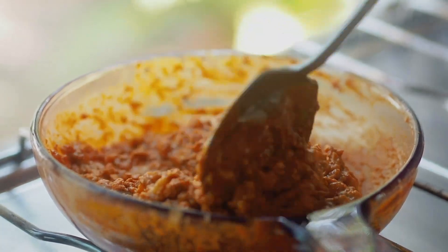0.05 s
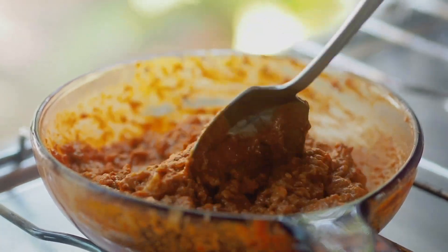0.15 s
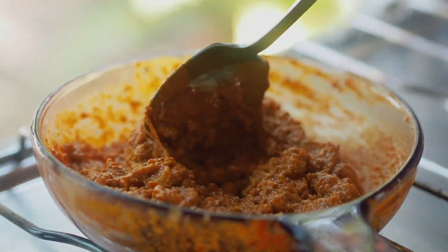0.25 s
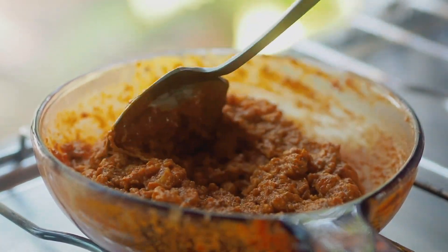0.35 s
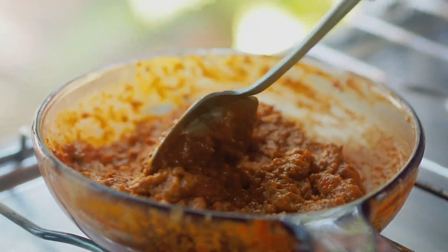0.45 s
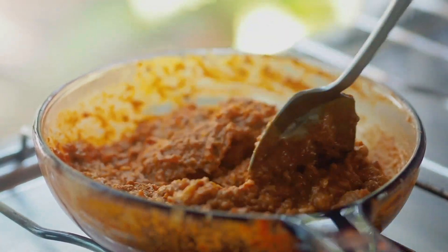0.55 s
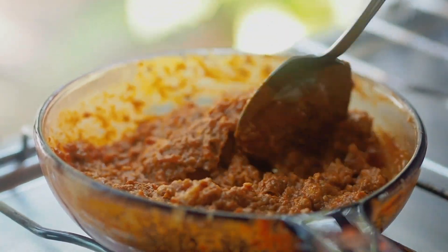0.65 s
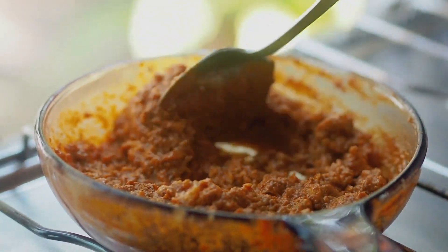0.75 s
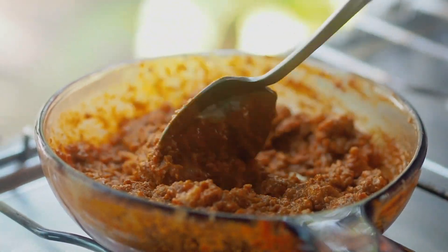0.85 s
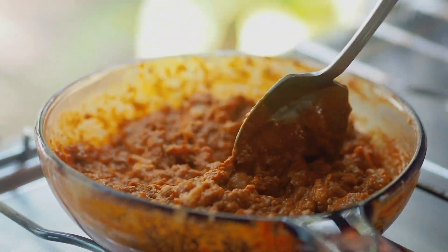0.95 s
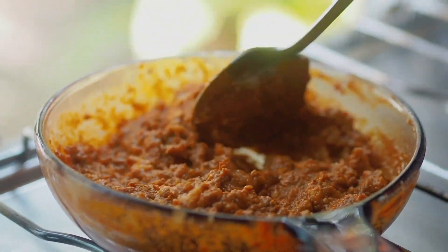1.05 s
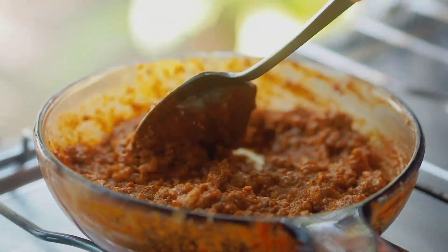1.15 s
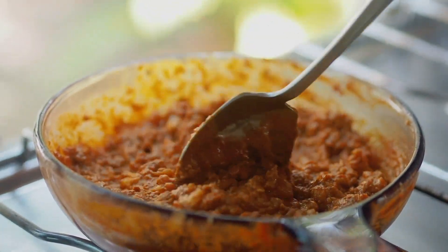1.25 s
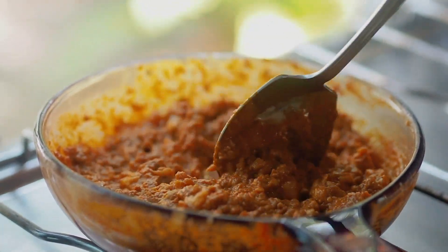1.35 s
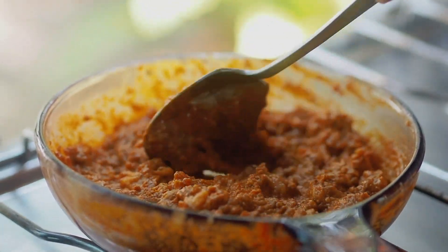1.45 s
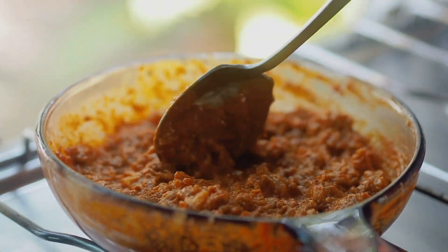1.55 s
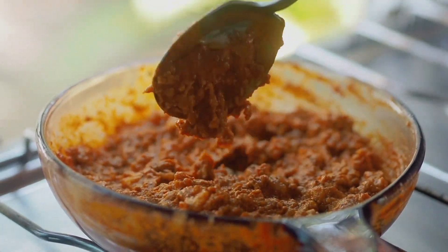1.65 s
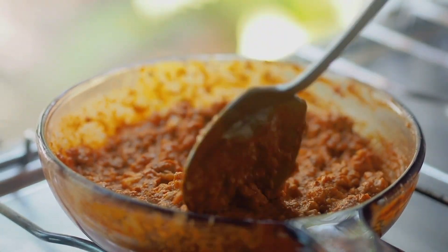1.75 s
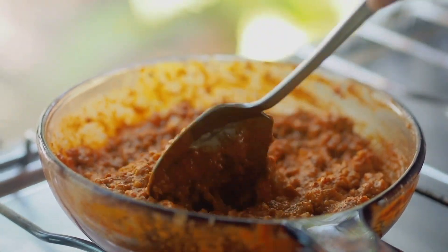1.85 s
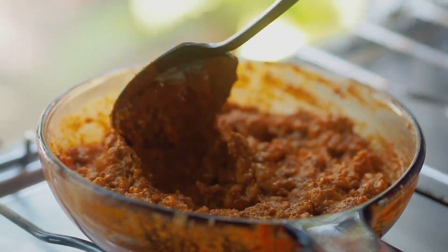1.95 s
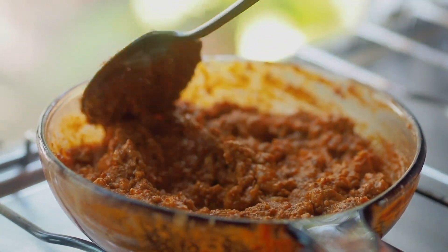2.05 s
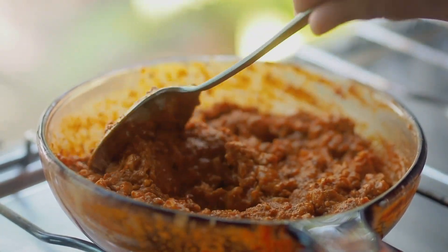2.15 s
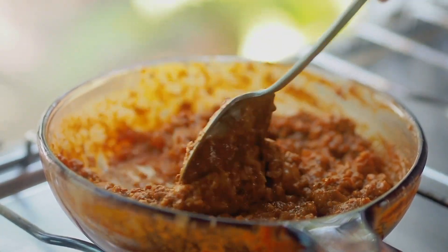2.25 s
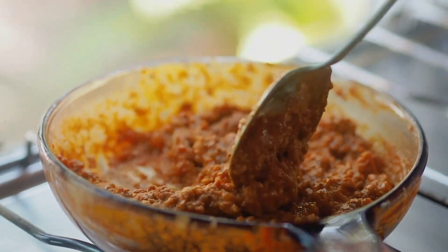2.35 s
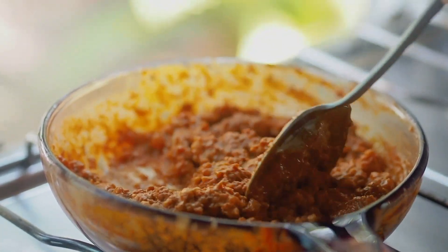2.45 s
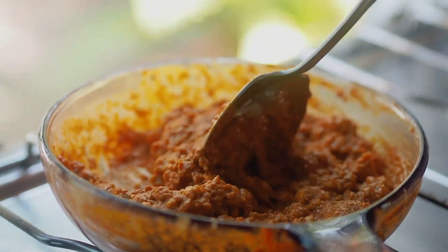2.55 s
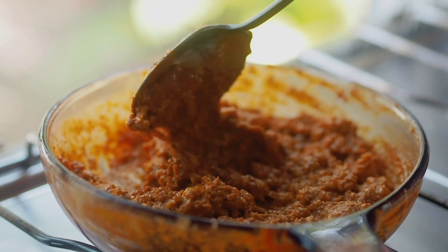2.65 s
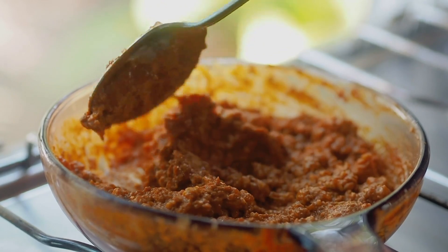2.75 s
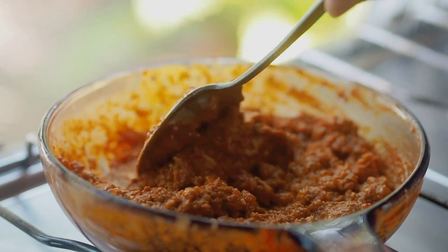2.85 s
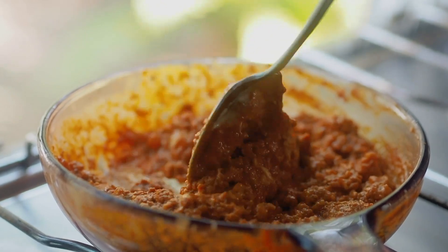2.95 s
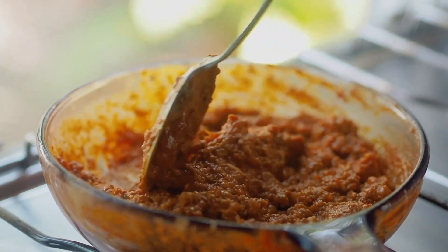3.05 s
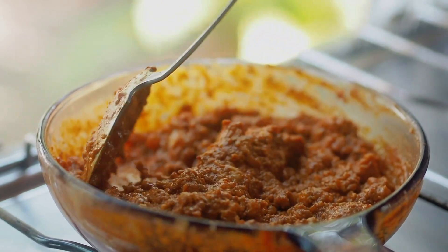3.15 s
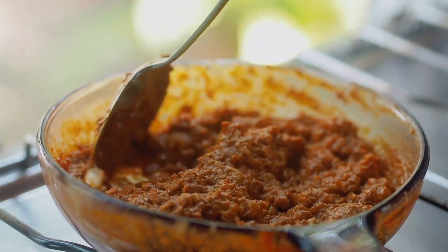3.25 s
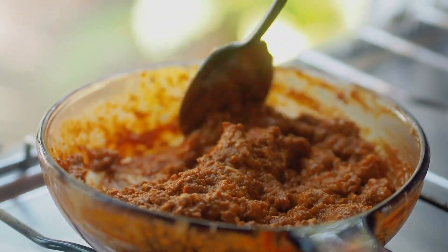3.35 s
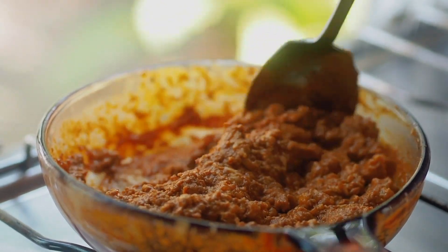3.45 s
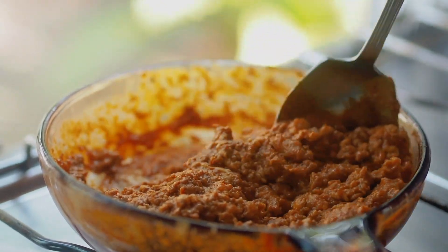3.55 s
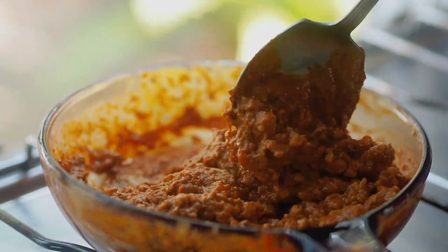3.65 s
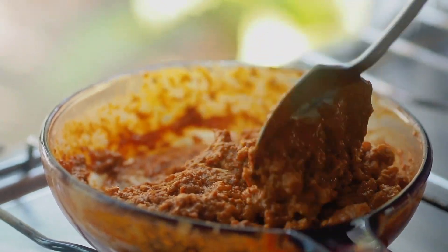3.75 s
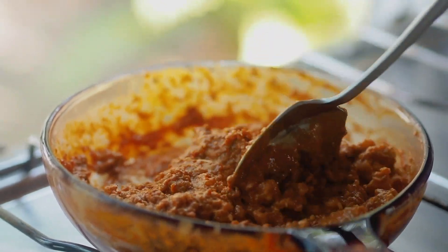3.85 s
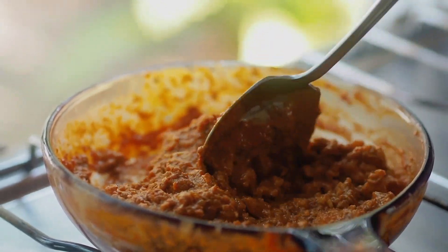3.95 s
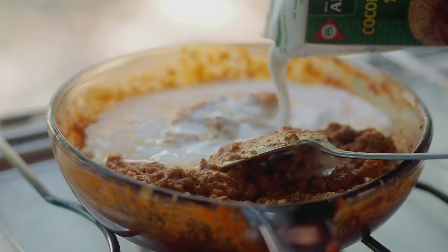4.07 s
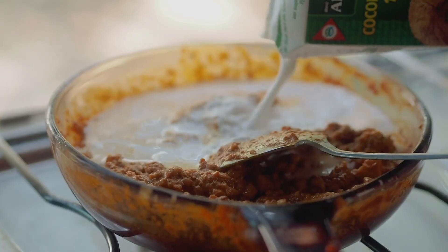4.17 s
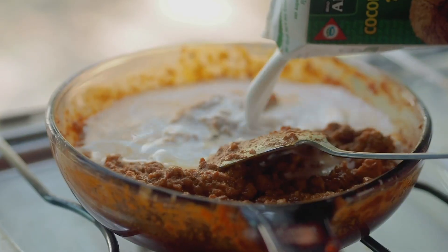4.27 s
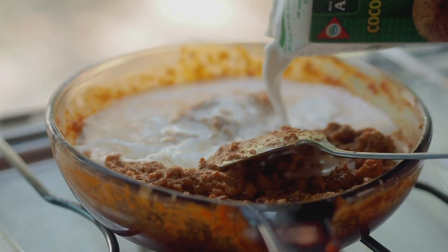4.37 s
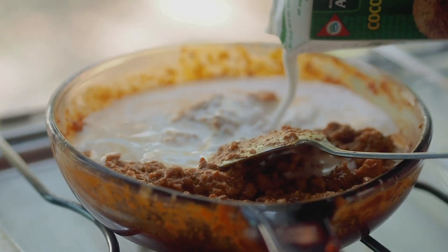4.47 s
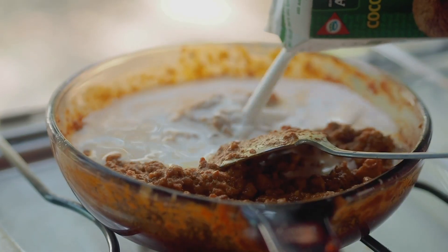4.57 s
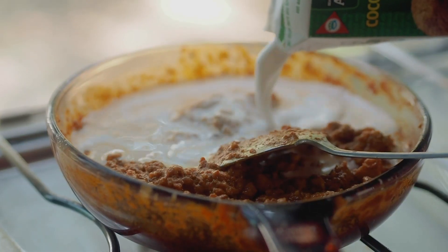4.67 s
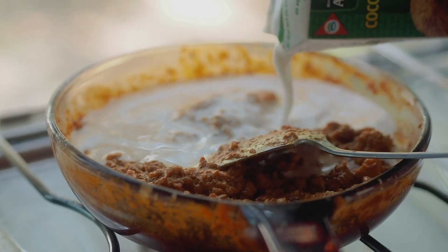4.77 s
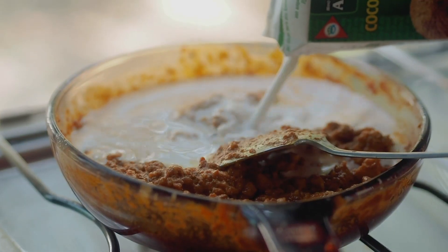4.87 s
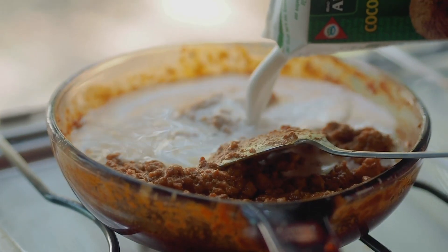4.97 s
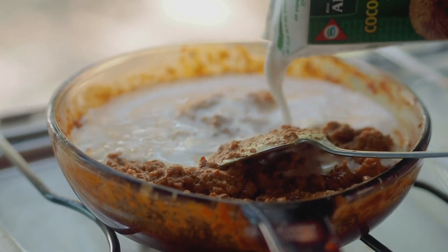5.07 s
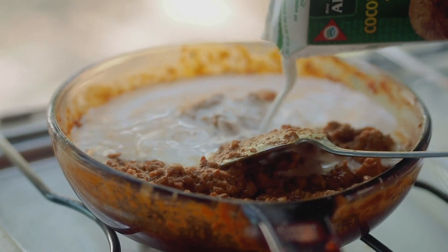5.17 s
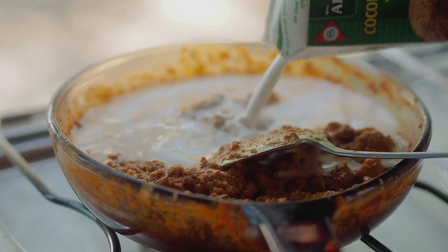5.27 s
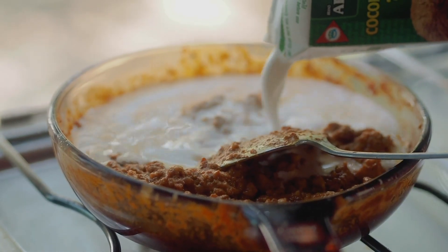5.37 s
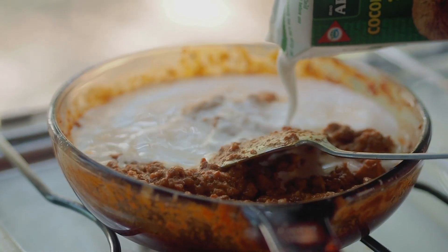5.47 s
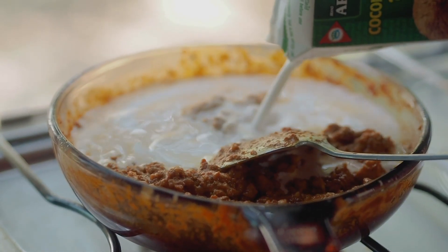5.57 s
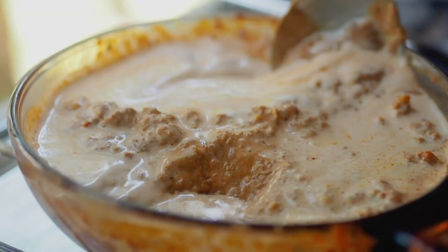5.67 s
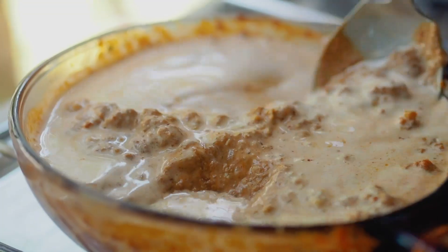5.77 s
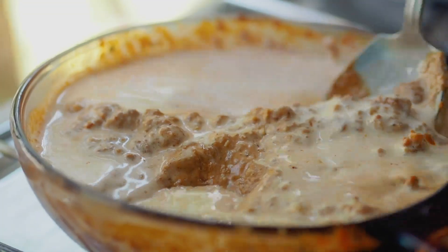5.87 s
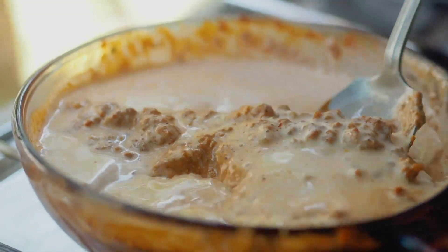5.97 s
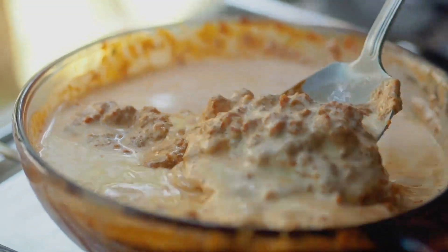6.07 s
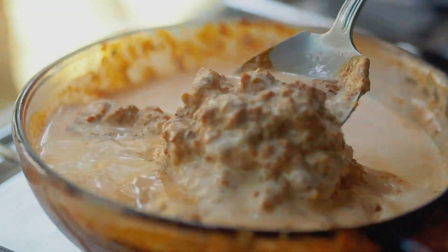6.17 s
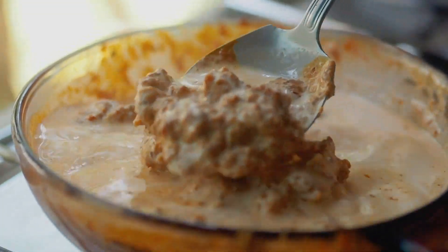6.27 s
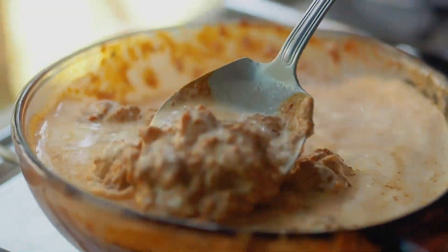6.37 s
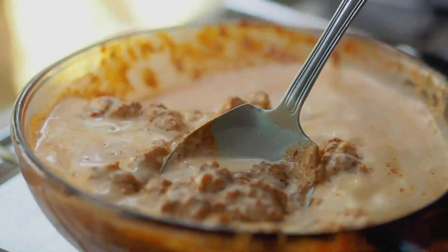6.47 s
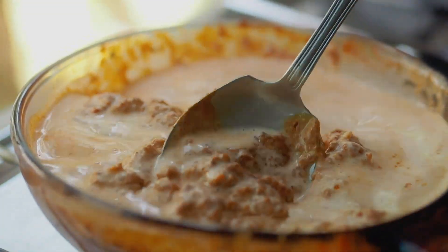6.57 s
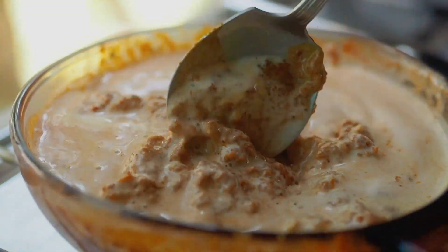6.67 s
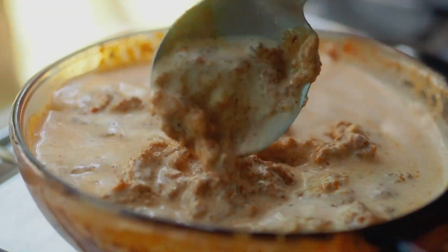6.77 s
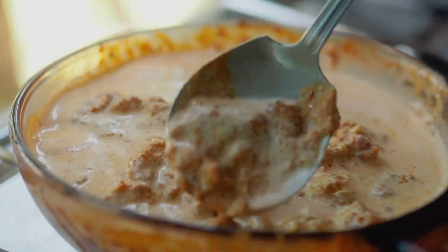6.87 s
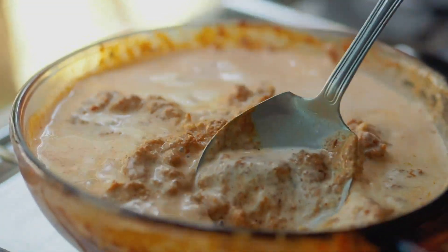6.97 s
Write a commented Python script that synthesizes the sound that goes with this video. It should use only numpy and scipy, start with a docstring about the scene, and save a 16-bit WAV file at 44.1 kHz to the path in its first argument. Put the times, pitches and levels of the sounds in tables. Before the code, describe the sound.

Close stereo perspective in a small kitchen with a short, bright reverberation. A quiet stove hiss with faint hum and thin whistle runs throughout. A steel spoon hits a glass bowl of thick paste hard at 0.2 and 0.4 seconds, crisp and quickly damped, with a softer knock at 0.6. Light taps and gritty rubbing fill 0.5 to 1.2. A duller double knock with a scrape comes at 1.5, then firm clinks at about 1.9, 2.2, 2.5 and 2.9, the last especially bright. Firm blows stir a low rough ring from the stove top. A medium knock at 3.25, a rapid softer cluster around 3.5 and a weak one at 3.9 end the action. Tiny distant high chirps occur around 0.8, 1.8, 2.9 and, fainter, later. From 4 to 7 mostly hiss remains, its whistle slightly stronger after 5.7, with barely audible touches near 5.5 and 5.8.

```python
"""Spoon working thick paste in a glass bowl

A steel spoon chops and turns paste in a glass bowl on a stove rack, in a small kitchen.
Each knock is filtered noise: a crack, chatter and a room tail, with decaying sines for glass and spoon.
Random slips excite the bowl as the spoon rubs its wall; firm knocks swell into a low ring of noise.
The stove is shaped noise with narrow bands; faint high chirps are gliding sines heard through the room."""
import sys
import numpy as np
from scipy import signal
from scipy.fft import rfft, irfft, next_fast_len
from scipy.io import wavfile

SR = 44100
rng = np.random.default_rng(int(sys.argv[2]) if len(sys.argv) > 2 else 0)


def master_out(mix):
    """Clip the mix to full scale and print it as 16-bit PCM to the path in sys.argv[1]."""
    frames = np.transpose(np.atleast_2d(mix))
    ceiling = np.clip(frames, -1, 1)
    pcm = np.round(ceiling * 32767).astype(np.int16)
    wavfile.write(sys.argv[1], SR, pcm)


N = 309582
TIME = np.arange(N) / SR


def amp(db):
    """Level: decibels become an amplitude ratio."""
    return 10 ** (np.asarray(db) / 20)


def rms_one(x):
    """Effective value: scale a sound to rms 1."""
    return x / np.sqrt(np.mean(x ** 2) + 1e-20)


def energy_one(x):
    """Energy normalization: unit energy per channel, averaged over the channels."""
    return rms_one(x) / np.sqrt(x.shape[-1])


def at_hz(points, hz):
    """Logarithmic frequency scale: interpolate a curve along log frequency."""
    point_hz, value = np.transpose(points)
    return np.interp(np.log(np.maximum(hz, 1)), np.log(point_hz), value)


def colour(x, points):
    """Minimum-phase filtering: a folded cepstrum makes a (Hz, dB) curve causal."""
    size = 2 * next_fast_len(x.shape[-1])
    hz = np.fft.rfftfreq(size, 1 / SR)
    cepstrum = irfft(np.log(amp(at_hz(points, hz))))
    cepstrum[1:size // 2] *= 2
    cepstrum[size // 2 + 1:] = 0
    response = np.exp(rfft(cepstrum))
    return irfft(rfft(x, size) * response, size)[..., :x.shape[-1]]


def through(x, response):
    """Convolution: a linear system is heard through its impulse response."""
    return signal.fftconvolve(np.atleast_2d(x), np.atleast_2d(response), axes=-1)[:, :x.shape[-1]]


def resonant(points, peaks):
    """Modal resonance: the powers of (Hz, width Hz, dB) peaks add to a (Hz, dB) curve."""
    hz = np.geomspace(20, SR / 2, 2000)
    power = 1 + sum(amp(2 * db) / (1 + (2 * (hz - centre) / width) ** 2) for centre, width, db in peaks)
    return np.c_[hz, at_hz(points, hz) + 10 * np.log10(power)]


def stereo_noise(size, likeness):
    """Interaural coherence: mid and side noise share power as a (Hz, 0-1) curve says."""
    alike = np.clip(at_hz(likeness, np.fft.rfftfreq(size, 1 / SR)), 0, 1)
    mid, side = rfft(rng.standard_normal((2, size)))
    left_right = np.sqrt(1 + alike) * mid + np.sqrt(1 - alike) * side * [[1], [-1]]
    return irfft(left_right, size)


# Reverberation of the kitchen: frequency_hz, t60_s
KITCHEN_DECAY = [(300, 0.5), (1000, 0.34), (2500, 0.3), (6000, 0.28), (14000, 0.28)]


def kitchen(t, build_s=0.0014):
    """Diffuse reverberation: noise builds up briefly, then decays, the treble sooner than the bass."""
    noise = rfft(stereo_noise(len(t), [(1000, 0.86), (2500, 0.12), (8000, 0.096)]))
    hz = np.fft.rfftfreq(len(t), 1 / SR)
    centres, t60s = np.transpose(KITCHEN_DECAY)
    tail = 0
    for share, t60 in zip(np.eye(len(centres)), t60s):
        band = irfft(noise * at_hz(np.c_[centres, share], hz), len(t))
        tail = tail + band * amp(-60 * t / t60)
    return energy_one(tail * (1 - np.exp(-t / build_s)))


# Relative spectrum of the stove hiss: frequency_hz, density_db (per Hz)
HISS_SPECTRUM = [(30, 8), (85, -8), (170, 6.5), (290, -1.5), (560, 1.5), (1000, 1.5), (1600, -4.5),
                 (3700, 3.5), (5000, 0), (6000, 7.5), (6500, -5), (9600, -4), (10400, -15.5), (13000, 0.5),
                 (16000, -13)]
# Narrow tones in the hiss, one group sounding throughout and two in turn:
# start_s, end_s, pitch_hz, width_hz, level_db (rms)
STOVE_TONES = [(0, 8, 180, 30.4, -68), (0, 8, 527, 25, -67), (0, 8, 1890, 70, -68.5),
               (0, 5.73, 5980, 45, -66), (0, 5.73, 716, 60, -69.5), (5.73, 8, 6060, 35, -61),
               (5.73, 8, 1040, 49.6, -74.5), (5.73, 8, 1360, 70.5, -68.5)]
# Left-right likeness of the stove noise: frequency_hz, likeness (0-1)
STOVE_LIKENESS = [(50, 1), (170, 0.96), (1000, 0.78), (4000, 0.31), (14000, 0.12)]
HISS_DB = -53   # rms


def stove(echo_db=-11.0, echo_s=0.012):
    """Flow noise and comb-like interference: echoes ripple a hiss with a low hum and a thin whistle."""
    size = 2 * next_fast_len(N // 2 + 1)
    hz = np.fft.rfftfreq(size, 1 / SR)
    t = TIME[:SR // 10]
    # dense echoes from nearby surfaces
    echoes = energy_one(rng.standard_normal(len(t)) * np.exp(-t / echo_s))
    echoes = colour(echoes, [(300, -14.5), (2500, -2)])
    hiss = irfft(rfft(stereo_noise(size, STOVE_LIKENESS)) * amp(at_hz(HISS_SPECTRUM, hz)))[:, :N]
    out = rms_one(through(hiss, (t == 0) + amp(echo_db) * echoes)) * amp(HISS_DB)
    flow = rfft(stereo_noise(size, STOVE_LIKENESS))
    for start, end, centre, width, db in STOVE_TONES:
        tone = rms_one(irfft(flow / (1 + ((hz - centre) / width) ** 2))[:, :N])
        sounding = (TIME >= start) & (TIME < end)
        out = out + amp(db) * tone * sounding
    return out


# Far chirps: start_s, length_s, pitch_hz (mid-glide), glide_octaves,
# level_db (rms, before the room mix and the trim)
CHIRPS = [(0.117, 0.095, 4230, -.35, -47.5), (0.796, 0.028, 4920, .3, -45.5),
          (0.822, .025, 4220, -0.17, -33), (0.867, .027, 4120, .4, -35.5), (0.882, .045, 3280, -0.8, -41),
          (1.356, 0.091, 4930, -0.48, -51), (1.772, 0.1, 4400, -0.18, -38.5),
          (2.886, 0.12, 4400, -.1, -35.5), (4.23, .07, 4410, -0.1, -55), (5.275, 0.063, 4680, 0.8, -47),
          (5.553, .07, 4220, 0.27, -52), (6.408, 0.07, 4460, 0.14, -46)]


def chirps(waver=0.067, waver_per_s=800, direct_db=0.0, trim_db=-3.5):
    """Frequency modulation: irregular waver roughens short glides, half heard by way of the room."""
    out = np.zeros(N)
    for start, length, pitch_hz, glide, db in CHIRPS:
        along = np.linspace(0, 1, int(length * SR))
        knots = np.linspace(0, 1, int(length * waver_per_s) + 2)
        wavering = 1 + waver * np.interp(along, knots, rng.standard_normal(len(knots)))
        hz = pitch_hz * 2 ** (glide * (along - .5)) * wavering
        tone = np.sin(np.pi * along) * np.sin(2 * np.pi * np.cumsum(hz) / SR)
        at = int(start * SR)
        out[at:at + len(along)] += amp(db) * rms_one(tone)
    t = TIME[:SR // 2]
    return amp(trim_db) * through(out, energy_one(amp(direct_db) * (t == 0) + kitchen(t)))


# Knocks at or above RACK_FROM_DB push the bowl down on its rack;
# the ring rises by RACK_FOLLOWS dB for each dB of blow.
RACK_FROM_DB, RACK_DB, RACK_FOLLOWS = -36.5, -46, 0.45


def rack(hz=370, width_hz=38, build_s=0.024, t60_s=0.32):
    """Coupled resonance: the stove top under the bowl swells into a low, rough ring after a firm knock."""
    t = TIME[:2 * int(.3 * SR)]
    swell = (1 - np.exp(-t / build_s)) ** 2 * amp(-60 * t / t60_s)
    band = 1 / (1 + ((np.fft.rfftfreq(len(t), 1 / SR) - hz) / width_hz) ** 2)
    out = np.zeros(N)
    for start, knock_db, _, sparkle_db, *_ in KNOCKS:
        if knock_db < RACK_FROM_DB:
            continue
        at = int(start * SR)
        db = RACK_DB + RACK_FOLLOWS * (knock_db + sparkle_db / 2)
        ring = energy_one(irfft(rfft(rng.standard_normal(len(t))) * band) * swell)
        # the level belongs to the crest of the swell
        out[at:at + len(t)] += amp(db) * ring * np.linalg.norm(swell) / swell.max()
    return out


# Spoon dragged along the glass: start_s (hardest push), level_db (at that push)
STROKES = [(0.46, -47), (0.53, -46), (0.62, -44), (0.75, -44.5), (0.9, -43), (1.0, -51), (1.235, -43.5),
           (1.5, -39), (3.57, -42.5)]
# All strokes share one pace; each knock also brings a short drag, DRAG_DB relative to it.
RUB_RISE_DB_PER_S, RUB_FALL_DB_PER_S, DRAG_DB = 520, 271, -24.5


def pressure():
    """Contact force: the rubbing level in dB swells to each push and fades after it; the strongest rules."""
    pushes = list(STROKES) + [(start, db + DRAG_DB) for start, db, *_ in KNOCKS]
    t = TIME[::64]
    levels = []
    for start, db in pushes:
        rise = RUB_RISE_DB_PER_S * (start - t)
        fall = RUB_FALL_DB_PER_S * (t - start)
        levels.append(db - np.maximum(rise, fall))
    return np.interp(TIME, t, np.max(levels, axis=0))


# Colour of the rubbing: frequency_hz, level_db
RUB_COLOUR = [(300, -42), (900, -10), (1500, -20), (2000, -3), (2700, -1), (3600, -7.5), (7000, -21),
              (14000, -25)]


def rubbing(slips_per_s=900, spread_db=3.0, room_db=-3.0):
    """Stick-slip friction: gritty paste under the spoon gives tiny slips that set the bowl ringing."""
    t = TIME[:SR // 2]
    happens = rng.random(N) < slips_per_s / SR
    direction = rng.choice([-1, 1], N)
    strength = amp(spread_db * np.minimum(rng.exponential(1, N), 4))
    slips = happens * direction * strength
    in_room = through(slips, (t == 0) + amp(room_db) * kitchen(t))
    return rms_one(colour(in_room, resonant(RUB_COLOUR, BOWL_MODES))) * amp(pressure())


# Resonances of the filled bowl, damped by the paste; they also colour knocks and rubbing:
# pitch_hz, width_hz, level_db
BOWL_MODES = [(653, 30, 8.5), (760, 18, 9.5), (884, 15, 10), (1149, 17, 7), (1442, 54, 16), (1860, 68, 8.5),
              (2400, 48, 3), (2410, 50, 2), (2750, 26, -5.5), (2827, 150, 6), (3340, 100, 4.5),
              (3755, 60, 4.5), (3840, 17, -5), (4246, 58, 10.5), (4930, 45, 7), (5290, 200, 4),
              (6050, 200, 8), (7053, 200, 9), (7800, 160, 2), (9380, 170, -0.5), (12800, 230, -1)]
# Modes near the hollow's pitch sing on, longer after a firmer blow: GLASS_T60_S holds at
# a body level of FIRM_DB and doubles for every T60_DOUBLES_DB above it.
GLASS_SING_DB, SING_REACH_OCTAVES, GLASS_T60_S, FIRM_DB, T60_DOUBLES_DB = -4, 0.24, 0.28, -25, 12
SPOON_T60_S = 0.15


def singing(trim_db=-1.0, room_db=-5.0, rise_s=0.00195):
    """Free vibration: glass and spoon modes decay exponentially after each knock, roughened by the room."""
    t = TIME[:2 * int(.2 * SR)]
    out = np.zeros(N + len(t))
    for start, db, body_db, _, hollow_hz, spoon_hz, ring_db, _ in KNOCKS:
        at, low_db = int(start * SR), db + body_db
        glass_t60 = GLASS_T60_S * 2 ** ((low_db - FIRM_DB) / T60_DOUBLES_DB)
        modes = [(spoon_hz, amp(db + ring_db), SPOON_T60_S)]
        for hz, *_ in BOWL_MODES:
            octaves = np.log2(hz / hollow_hz)
            if abs(octaves) < 1:
                gain = amp(low_db + GLASS_SING_DB) / (1 + (octaves / SING_REACH_OCTAVES) ** 2)
                modes.append((hz, gain, glass_t60))
        ring = sum(gain * amp(-60 * t / t60) * np.sin(2 * np.pi * hz * t) for hz, gain, t60 in modes)
        out[at:at + len(t)] += ring * (1 - np.exp(-t / rise_s))
    return amp(trim_db) * through(out[:N], energy_one((t == 0) + amp(room_db) * kitchen(t)))


# The high band follows the sparkle, and gains when the spoon rings higher.
HIGH_FOLLOWS_SPARKLE, HIGH_DB_PER_OCTAVE, USUAL_SPOON_HZ = 0.36, 5, 2490


def band_levels(db, body_db, sparkle_db, spoon_hz):
    """Contact hardness: bare steel sparkles, a cushion of paste dulls the low, mid, high, top levels."""
    high_db = HIGH_FOLLOWS_SPARKLE * sparkle_db + HIGH_DB_PER_OCTAVE * np.log2(spoon_hz / USUAL_SPOON_HZ)
    return db + np.array([body_db, 0, high_db, sparkle_db])


# Limits of the low, mid, high and top bands of a knock: frequency_hz
BAND_EDGES_HZ = [550, 1500, 3200, 7000, 16000]


def set_tone(x, levels_db):
    """Band power: filter a knock so that its first 24 ms approach the four band levels."""
    size = int(.024 * SR)
    edges = np.array(BAND_EDGES_HZ)
    band = np.digitize(np.fft.rfftfreq(size, 1 / SR), edges) - 1
    centres = np.sqrt(edges[1:] * edges[:-1])
    for _ in range(2):   # neighbouring bands interact, so a second pass refines
        power = 2 * np.mean(abs(rfft(x[:, :size])) ** 2, axis=0) / size ** 2
        now_db = [10 * np.log10(power[band == k].sum()) for k in range(len(levels_db))]
        x = colour(x, np.c_[centres, np.subtract(levels_db, now_db)])
    return x


# Colour of a contact, before the band levels are set: frequency_hz, level_db
CONTACT_COLOUR = [(40, -35), (300, -37.5), (560, -23.5), (800, -12.5), (1150, -2), (1350, -13),
                  (1650, -2.5), (2000, 6.5), (2900, 4.5), (3500, 0), (7000, -14), (9600, -17.5),
                  (10400, -27), (12500, -21.5), (16000, -37)]
HOLLOW_DB = 14.5   # height of the resonance of the hollow dug in the paste
CUSHION = 0.12   # paste softens the crack: dB more chatter for each dB of sparkle lost


def knock(levels_db, hollow_hz, spoon_hz, room_db, cushion_db, crack_s=0.00051, chatter_s=.012,
          chatter_shape=1.64, scatter_db=1.0, hollow_width_hz=110, spoon_width_hz=260, spoon_db=14.5):
    """Impact excitation: a crack, then chatter on wall and rack, then the room, filtered by resonances."""
    t = TIME[:2 * int(.2 * SR)]
    crack = stereo_noise(len(t), [(1000, 0.85), (8000, 1.0)]) * np.exp(-t / crack_s)
    # the low tones take longer to speak, so the crack itself is thin
    crack = colour(energy_one(crack), [(600, -28.5), (2000, 3.0)])
    chatter = stereo_noise(len(t), [(1200, 0.93), (2500, 0.78), (6000, 0.33)])
    chatter = energy_one(chatter * np.exp(-(t / chatter_s) ** chatter_shape))
    contact = energy_one(crack + amp(cushion_db) * chatter)
    tail = amp(room_db) * colour(kitchen(t), [(900, 3.5), (2500, -4), (4500, -1.5), (12000, -1)])
    # each contact point favours other modes
    peaks = [(hz, width, db + scatter_db * rng.standard_normal()) for hz, width, db in BOWL_MODES]
    # the hollow dug in the paste and the spoon add one resonance each
    peaks += [(hollow_hz, hollow_width_hz, HOLLOW_DB), (spoon_hz, spoon_width_hz, spoon_db)]
    return set_tone(colour(contact + tail, resonant(CONTACT_COLOUR, peaks)), levels_db)


# Spoon on glass; body, sparkle and the spoon's free ring are relative to the level,
# the room tail to the contact noise before colouring:
# start_s, level_db, body_db, sparkle_db, hollow_hz, spoon_hz, ring_db, room_db
KNOCKS = [(0.176, -18.5, -8.5, -7, 917, 4270, -26, -8.5),
          (0.4086, -18.5, -16.5, -12.5, 1149, 2410, -12, -9.5), (0.5306, -48, -14, -21, 780, 2870, -12, -4),
          (0.576, -44, -10, -28, 855, 2000, -12, 8), (0.6257, -27, -13.5, -12.5, 836, 2230, -17, -3),
          (0.974, -36, -13, -30, 840, 2320, -12, -2.5), (1.0127, -46, -11, -38, 886, 2220, -8, -5),
          (1.0794, -39.5, -15, -21.5, 1110, 2130, -18, 4), (1.1355, -42, 2.5, -21, 1149, 3150, -5, -12),
          (1.5022, -21.5, -25.5, -26.5, 870, 2630, -4.5, -4.5),
          (1.5298, -25.5, -14.5, -32, 1090, 2622, 3, -13),
          (1.8652, -18.5, -8.5, -7.5, 760, 2680, -22, -2.5), (2.175, -23, -5, -6.5, 1180, 5010, -12.5, -6),
          (2.5138, -19, -15, -9.5, 905, 2336, -5, -6), (2.8832, -19.5, -13.5, -2, 1400, 2827, -17, -5),
          (3.2549, -28, -4.5, -10, 1275, 2827, -7, -5), (3.4717, -31, -6, -17, 1070, 3020, -2, -0.5),
          (3.5026, -32.5, -10, -17.5, 960, 3600, -10, -5), (3.5388, -36, -8, -14, 760, 4340, -18, -4),
          (3.552, -38, -9, -17, 830, 3960, -15, -12), (3.8911, -35.5, -15, -20.5, 946, 2260, -21, -8),
          (5.486, -57.5, -10, -5, 900, 2890, -18, 0), (5.7663, -54, -0.5, -7, 910, 1870, -9, 0),
          (6.9871, -69, -5.5, 28, 1020, 8640, -15, -1)]


def knocks(pan_db=-0.4):
    """Superposition: every touch of the spoon adds at its time, with a slight level difference of the ears."""
    out = np.zeros((2, N))
    for start, db, body_db, sparkle_db, hollow_hz, spoon_hz, _, room_db in KNOCKS:
        at = int(start * SR)
        levels_db = band_levels(db, body_db, sparkle_db, spoon_hz)
        sound = knock(levels_db, hollow_hz, spoon_hz, room_db, -CUSHION * sparkle_db)[:, :N - at]
        out[:, at:at + sound.shape[1]] += sound
    return out * amp([[pan_db / 2], [-pan_db / 2]])


def scene():
    """Superposition of sources: stove and chirps behind, rack, bowl and spoon in front."""
    return stove() + chirps() + rack() + rubbing() + singing() + knocks()


CUTOFF_HZ = 16200


def record(dry, ceiling=2.6, lopsided=0.031, low_cut_hz=42):
    """Asymmetric overload: the hardest peaks bend and gain a soft thump; deep bass and top are cut."""
    rounded = ceiling * np.tanh(dry / ceiling)
    overloaded = rounded + lopsided * rounded ** 4
    low_cut = signal.butter(4, low_cut_hz, "high", fs=SR, output="sos")
    thin = signal.sosfilt(low_cut, overloaded)
    top_cut = signal.ellip(10, .2, 90, CUTOFF_HZ, fs=SR, output="sos")
    return signal.sosfilt(top_cut, thin)


dry = scene()
out = record(dry)
master_out(out)
```